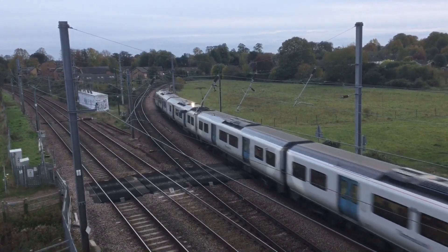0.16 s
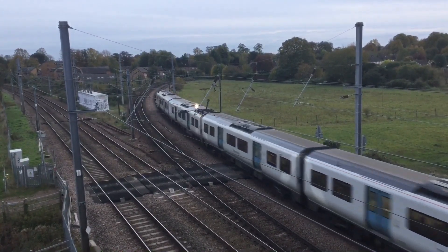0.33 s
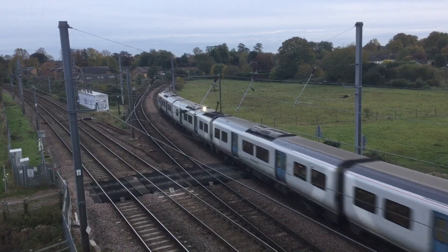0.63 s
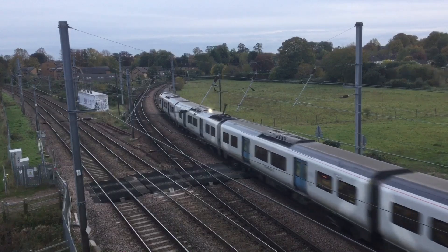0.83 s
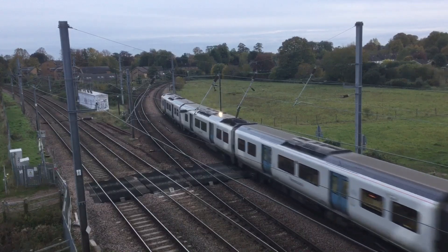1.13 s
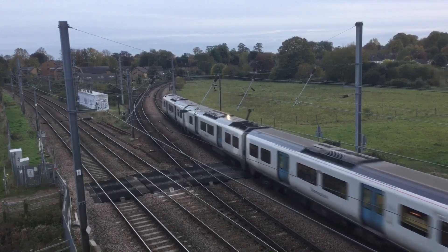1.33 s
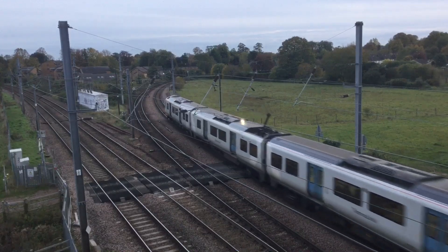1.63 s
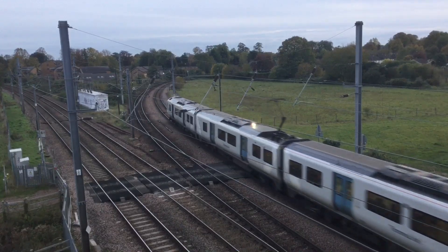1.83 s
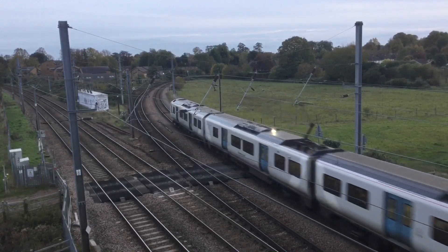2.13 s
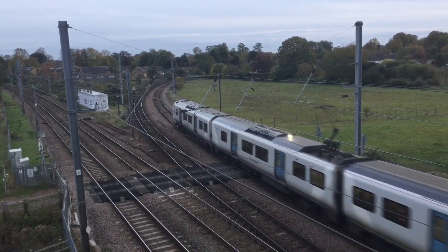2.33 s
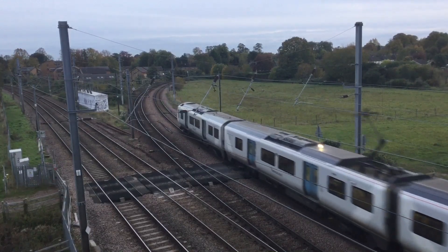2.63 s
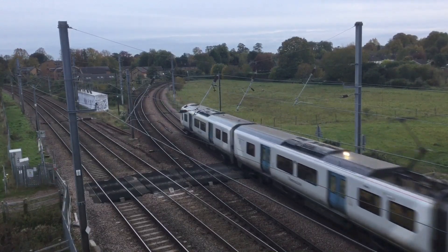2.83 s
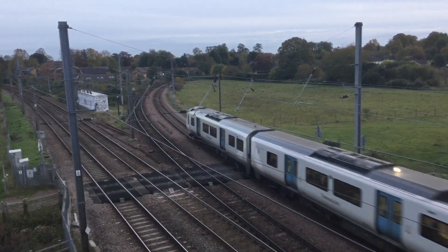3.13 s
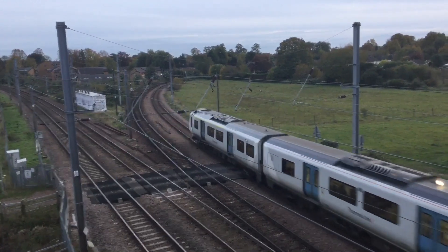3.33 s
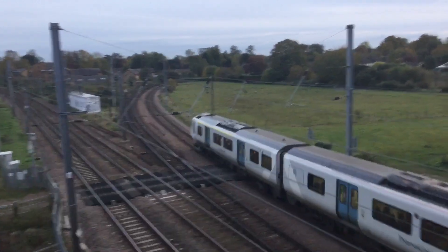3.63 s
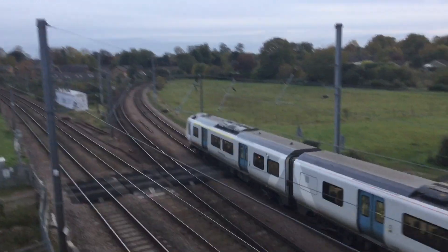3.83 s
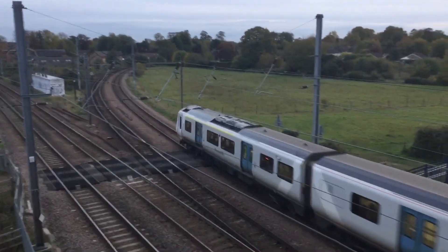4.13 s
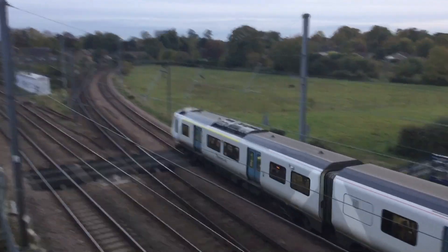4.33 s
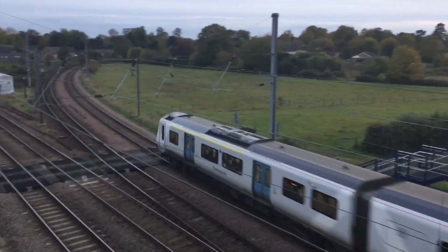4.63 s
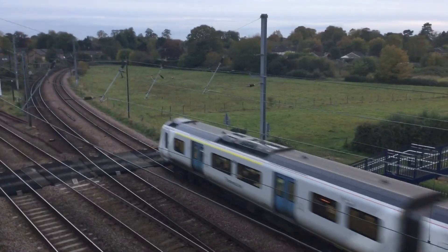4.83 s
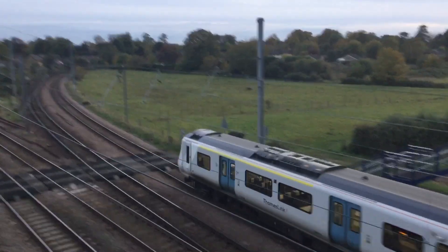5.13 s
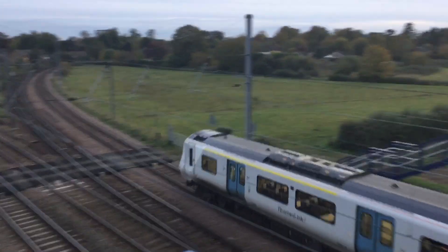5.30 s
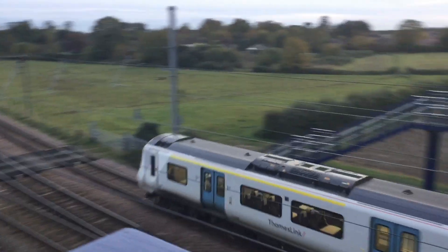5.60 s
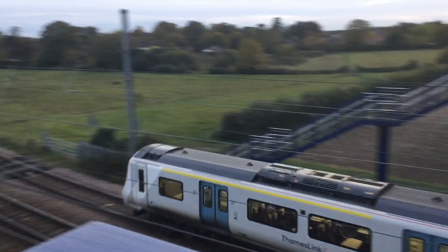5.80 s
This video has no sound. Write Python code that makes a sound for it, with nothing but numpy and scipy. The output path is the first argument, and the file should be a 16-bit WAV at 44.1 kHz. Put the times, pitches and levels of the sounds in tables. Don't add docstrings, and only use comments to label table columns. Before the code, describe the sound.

Steady rolling roar and airy hiss of an electric train, broken by deep track thumps, steel clanks and one tiny flange squeak.

```python
import sys
import numpy as np
from scipy import signal
from scipy.fft import rfft, irfft
from scipy.io import wavfile
from scipy.ndimage import uniform_filter1d

SR = 44100
rng = np.random.default_rng(int(sys.argv[2]) if len(sys.argv) > 2 else 0)


def pcm_store(signal):
    levels = np.round(np.clip(np.atleast_2d(signal), -1, 1) * 32767)
    wavfile.write(sys.argv[1], SR, levels.astype(np.int16).T)


def convert_level_to_amplitude(level_db):
    exponent = np.asarray(level_db, float) / 20
    return 10 ** exponent


N = 262835

# (pitch_hz, width_hz, level_db)
WHEEL_MODES = [(1424, 51, -6), (2130, 130, -2), (2826, 76, -4.5), (3614, 73, -13), (4720, 60, -16),
               (5680, 140, -18.5)]
# (start_s, peak_db, upper_rail_modes_db, wheel_crack_db,
# lean_db from the second mode to the lowest)
JOINT_CLANKS = [(0.544, -15.5, -3.5, -11.5, -12), (0.737, -17, -5.5, -11.5, -11.5),
                (1.052, -12.5, -6.5, -15, -15.5), (1.241, -17.5, -2.5, -12, -8),
                (1.603, -15, -20, -37, -8.5), (2.25, -19.5, 0.5, -11, -5), (2.439, -20.5, -10, -9.5, -7.5),
                (2.764, -23.5, -5, -7.5, -13), (2.944, -19, -13, -13, -10.5), (3.978, -14, -6, -16, -16),
                (4.163, -19.5, -6.5, -11, -12), (4.486, -14.5, -4.5, -16.5, -25),
                (4.678, -17, -5.5, -16, -9), (5.181, -23.5, -1, -26, -15), (5.712, -16.5, 0, -12.5, 0.5),
                (5.902, -17.5, -4.5, -13.5, 8)]


def evened(x):
    return x / np.sqrt(np.mean(x ** 2) + 1e-20)


def read(points, hz):
    f, value = np.transpose(points)
    return np.interp(np.log(hz + 1), np.log(f + 1), value)


def add(mix, s, sound):
    at = round(s * SR)
    part = mix[max(at, 0):][:len(sound) + min(at, 0)]
    part += sound[max(-at, 0):][:len(part)]


def colour(x, points):
    gain = convert_level_to_amplitude(read(points, np.fft.rfftfreq(len(x), 1 / SR)))
    return evened(irfft(rfft(x) * gain, len(x)))


def resonate(x, hz, width):
    turn = np.exp(2j * np.pi * np.cumsum(hz * np.ones(len(x))) / SR)
    r = np.exp(-np.pi * width / SR)
    return 2 * (turn * signal.lfilter([1 - r], [1, -r], x / turn)).real


def resonate_twice(x, hz, width):
    return evened(resonate(resonate(x, hz, width), hz, width))


def drift(seconds):
    size = int(seconds * SR)
    return evened(uniform_filter1d(uniform_filter1d(rng.standard_normal(N), size), size))


def patchy(points, patchy_db, flicker_db):
    frames = N // 128 + 5
    a, b, patches = rng.standard_normal((frames, 257, 3)).T
    patches = evened(uniform_filter1d(uniform_filter1d(patches, size=5, axis=0), size=16, axis=1))
    flicker = evened(uniform_filter1d(rng.standard_normal(frames), size=6))
    z = (a + 1j * b) * convert_level_to_amplitude(patchy_db * patches + flicker_db * flicker)
    return colour(signal.istft(z, nperseg=512, noverlap=384)[1][:N], points)


def wheel_rings():
    rings = np.zeros(N)
    for hz, width, db in WHEEL_MODES:
        waver_db = 2.1 * drift(0.0077) + 1.2 * drift(0.043)
        pitch = hz * (1 + 0.0087 * drift(0.11))
        ring = resonate(rng.standard_normal(N), pitch, width)
        rings += convert_level_to_amplitude(db + waver_db) * evened(resonate(ring, hz, 3 * width))
    return evened(rings)


def rolling():
    # (start_s, rumble_db)
    weight = [(0, -31.5), (.55, -32.5), (.68, -32), (.86, -32.5), (2.01, -32.5), (2.36, -30), (2.56, -32.5),
              (3.25, -32.5), (3.8, -29.5), (3.89, -30.5), (4.7, -30.5), (4.85, -33.5), (4.98, -31.5),
              (5.41, -28.5), (5.58, -32.5), (5.66, -43), (5.75, -24.5), (5.96, -35.5)]
    # (pitch_hz, level_db per Hz)
    rumble_tone = [(15, -42), (25, -7), (63, 1.5), (151, -1.5), (258, -4), (392, -14), (551, -9.5),
                   (1200, -27.5), (1560, -36), (2640, -120)]
    roar_tone = [(470, 9), (800, 3), (1910, -2), (2110, 0.5), (2570, -4), (2840, -5), (3060, -6),
                 (3800, -14), (5760, -21), (11600, -39.5), (14100, -43), (15600, -64)]
    t = np.arange(N) / SR
    rumble_db = np.interp(t, *np.transpose(weight))
    roar_db = -37.85 - 1.18 * uniform_filter1d(rumble_db + 32, size=SR // 2)
    coach_s, roof_fan_s, tail_s = 1.71, 1.75, 4.5
    hiss_db = -55 + 1.5 * np.cos(2 * np.pi * (t - roof_fan_s) / coach_s)
    hiss_db -= 2.5 * np.maximum(t - tail_s, 0)
    rumble = patchy(rumble_tone, patchy_db=1.6, flicker_db=2.6) * convert_level_to_amplitude(rumble_db - 1)
    roar = patchy(roar_tone, patchy_db=2.0, flicker_db=-0.32)
    hiss = signal.sosfiltfilt(signal.butter(2, 4500, "high", fs=SR, output="sos"), roar)
    body = roar - hiss + convert_level_to_amplitude(-9) * wheel_rings()
    return rumble + body * convert_level_to_amplitude(roar_db) + evened(hiss) * convert_level_to_amplitude(hiss_db)


def thuds(blows):
    out, t = np.zeros(N), np.arange(-.04, .12, 1 / SR)
    for (s, db, hz, ms), (p, q) in zip(blows, rng.random((len(blows), 2))):
        spread = 0.00035 * ms
        lead = np.exp(-np.clip(t + 0.85 * spread, -.002, 1) / (.5 * spread))
        bed = np.cos(2 * np.pi * (hz * (t - 0.45 * spread * lead) + p))
        ground_db = -5.5 if hz < 200 else -6.5
        ground = convert_level_to_amplitude(ground_db) * np.cos(2 * np.pi * (0.542 * hz * t + q))
        swell = np.exp(-.5 * (t / spread / np.where(t < 0, .4, 1.35)) ** 2)
        add(out, s - .043, convert_level_to_amplitude(db) * (bed + ground) * swell)
    return out


def bed_blows():
    # (peak_s, peak_db, pitch_hz, length_ms)
    sleepers = [(.007, -18.5, 79.6, 13), (.107, -23, 140, 43), (.323, -21.5, 139, 37),
                (.499, -23.5, 128, 45), (.721, -16, 163, 17), (.828, -18.5, 88.5, 17),
                (.975, -14, 154, 3.5), (1.456, -17.5, 115, 18), (1.548, -22, 133, 41),
                (1.657, -14, 115, 8.1), (2.173, -7.5, 143, 12), (2.683, -13.5, 136, 7.9),
                (3.233, -28, 108, 56), (3.496, -24, 164, 72), (3.599, -23, 129, 29),
                (4.079, -14.5, 124, 18), (4.204, -23, 118, 22), (4.757, -14, 151, 12), (4.79, -23, 118, 18),
                (4.895, -18, 122, 12), (4.935, -15, 148, 12), (5.19, -16, 112, 65), (5.296, -12.5, 125, 11),
                (5.319, -16, 162, 17), (5.449, -12.5, 159, 5.9), (5.527, -15, 85.5, 14),
                (5.576, -10.5, 114, 11.5), (5.606, -21, 97, 28), (5.805, -22.5, 65.4, 63),
                (5.92, -17, 158, 37)]
    # (start_s, peak_db, pitch_hz)
    drops = [(.175, -20, 239), (.524, -16.5, 177), (.679, -23.5, 220), (1.11, -15.5, 240),
             (1.272, -18.5, 242), (1.346, -11, 215), (1.362, -13.5, 197), (1.582, -16, 156),
             (1.62, -16, 169), (1.737, -16, 172), (2.206, -24, 226), (2.342, -13, 162), (2.462, -23.5, 224),
             (2.523, -22.5, 232), (2.768, -7.5, 203), (2.812, -24, 161), (2.859, -21, 213),
             (3.026, -19, 249), (3.155, -32.5, 207), (3.542, -22, 172), (3.647, -22, 190),
             (3.67, -21.5, 184), (3.712, -35.5, 242), (3.795, -11, 186), (4.189, -18, 218),
             (4.473, -9.5, 182), (4.595, -13.5, 173), (5.068, -29, 174), (5.374, -17, 186),
             (5.797, -21.5, 211)]
    # (start_s, peak_db, pitch_hz)
    knocks = [(.015, -17, 316), (.337, -19, 375), (.869, -32, 288), (1.323, -24.5, 267), (1.464, -22, 294),
              (1.546, -20.5, 336), (1.956, -36, 276.6), (2.08, -21.5, 268), (2.267, -22, 247),
              (2.343, -13, 350), (2.668, -24.5, 281), (2.947, -32.5, 500), (3.736, -23, 264),
              (3.881, -31, 245), (3.932, -23, 260), (3.944, -31.5, 265), (4.005, -14, 356),
              (4.06, -20, 290), (4.225, -9.5, 228), (4.46, -20, 358), (4.51, -35.5, 251), (5.065, -15, 327),
              (5.106, -27, 253), (5.216, -18, 300), (5.271, -23.5, 252), (5.352, -11, 228),
              (5.419, -18.5, 270), (5.569, -18, 300), (5.727, -8.5, 261), (5.779, -9.5, 272)]
    # (delay_s, level_db, pitch_hz, length_ms)
    joint_bed = [(0.012, -5, 155, 23.6), (0.00469, -6.5, 337, 10), (0.043, -17, 267, 37),
                 (0.1, -15.5, 136, 23)]
    # (start_s, peak_db, pitch_hz)
    far_joints = [(0.03, -26.5, 227), (0.267, -26, 680), (0.284, -28.5, 260), (0.403, -31, 527),
                  (0.449, -31, 184), (0.59, -24, 460), (1.083, -25, 227), (1.139, -24, 413),
                  (1.295, -23, 245), (1.396, -29, 151), (1.453, -22.5, 347), (1.955, -24.5, 304),
                  (2.19, -24, 487), (2.226, -20.5, 300), (2.23, -24, 160), (2.252, -14, 484),
                  (2.297, -23, 685), (2.318, -26, 198), (2.321, -35, 458), (2.379, -26, 302),
                  (2.458, -33, 113), (2.465, -22.5, 480), (2.488, -21, 256), (2.617, -29, 150),
                  (2.765, -15.5, 205), (2.771, -18.5, 556), (2.839, -36, 487), (2.988, -28, 455),
                  (2.993, -29, 282), (3.236, -28.5, 260), (3.32, -28, 524), (3.541, -35, 186),
                  (3.618, -33, 263), (3.73, -29, 685), (3.825, -32, 263), (3.882, -35, 263),
                  (3.932, -27, 280), (3.981, -14.5, 513), (4.001, -25, 330), (4.113, -35, 491),
                  (4.2, -17, 445), (4.226, -18.5, 274), (4.317, -43, 121), (4.333, -40, 229),
                  (4.403, -33, 280), (4.49, -14, 525), (4.773, -24.5, 425), (4.89, -32, 746),
                  (4.919, -31, 460), (5.009, -29, 105), (5.01, -38, 324), (5.017, -29, 655),
                  (5.093, -22, 213), (5.098, -23, 491), (5.191, -14, 790), (5.521, -26, 387),
                  (5.593, -23, 393), (5.717, -16, 440), (5.908, -13.5, 420), (5.91, -18.5, 800)]
    rows = list(sleepers)
    for table, cycles in ((drops, 1.56), (knocks, 1.7)):
        for s, db, hz in table:
            softer = np.exp(-0.142 * (db + 12.5))
            rows.append((s, db, hz, 1000 / hz * cycles * softer))
    for s, db, *_ in JOINT_CLANKS:
        rows += [(s + late, db + bed_db, hz, ms) for late, bed_db, hz, ms in joint_bed]
    far_late_s, far_cycles = 0.00404, 3.37
    rows += [(s + far_late_s, db, hz, 1000 / hz * far_cycles) for s, db, hz in far_joints]
    return thuds(rows)


def echoes(x):
    t = np.arange(0, .5, 1 / SR)
    hits = rng.random(len(t)) < 1500 / SR
    t60 = 0.17
    taps = rng.standard_normal(len(t)) * hits * convert_level_to_amplitude(-60 * t / t60) * (t > .008)
    return signal.fftconvolve(x, taps / np.linalg.norm(taps))[:N]


def stray_blows():
    # (peak_s, peak_db, pitch_hz, length_ms)
    strays = [(.073, -38, 1250, 5), (.203, -34, 1280, 5), (.267, -36, 780, 5.2), (.32, -31, 740, 6),
              (.338, -23.5, 268, 18), (.465, -35, 1300, 5), (.569, -24, 268, 12), (.716, -15.5, 247, 12),
              (.728, -33, 1190, 5), (.733, -19.5, 330, 8), (.977, -38, 1150, 6), (1.086, -36, 1250, 6),
              (1.264, -31, 1250, 6), (1.545, -33, 786, 7.6), (1.584, -25, 447, 8), (1.883, -40, 1300, 5),
              (2.069, -24, 330, 4.1), (2.297, -32, 800, 7), (2.757, -21, 208, 9.7), (2.858, -23, 160, 14),
              (2.954, -32, 1200, 8), (3.713, -36, 710, 15), (3.96, -24, 450, 11), (3.97, -22, 85, 24),
              (4.462, -34, 746, 9.1), (4.482, -15, 267, 9.5), (4.578, -20.5, 260, 8),
              (4.581, -20, 153, 9.9), (4.843, -39, 1300, 5.6), (4.938, -23, 80, 28), (5.12, -21, 75, 35),
              (5.188, -14, 262, 7.2), (5.209, -34, 1250, 6), (5.342, -24, 170, 14), (5.738, -28, 457, 9),
              (5.777, -29, 150, 14), (.56, -20, 170, 10), (.549, -22, 890, 6.4), (1.61, -22, 320, 14),
              (1.066, -33, 1090, 10), (2.03, -30, 70, 35), (3.36, -31.5, 257, 28), (4.79, -31, 700, 6),
              (5.6, -27, 220, 18), (5.72, -22, 420, 11), (5.715, -24, 880, 11), (4.167, -29, 650, 6),
              (1.058, -29, 940, 7.1)]
    return thuds(strays)


def raps():
    # (start_s, peak_db, pitch_hz)
    edges = [(0.333, -18, 490), (0.521, -23, 700), (1.345, -16.5, 470), (1.45, -25, 398), (1.556, -19, 690),
             (1.58, -22, 560), (1.614, -10.5, 580), (2.167, -13, 472), (2.203, -14.5, 460),
             (2.454, -17, 484), (3.709, -23, 640), (3.921, -22, 613), (4.074, -15, 430), (4.224, -12, 442),
             (4.455, -19, 430), (4.574, -14, 450), (4.752, -17.5, 433), (4.789, -23.5, 660),
             (5.064, -10, 480), (5.085, -34, 457), (5.11, -10.5, 550), (5.19, -20, 860), (5.209, -20, 595),
             (5.413, -26, 526), (5.443, -20, 476), (5.521, -25, 410), (5.563, -19.5, 507)]
    out, t = np.zeros(N), np.arange(0, .03, 1 / SR)
    for (s, db, hz), p in zip(edges, rng.random(len(edges))):
        turns = hz * (t - 0.00032 * np.exp(-t / 0.0018)) + p
        shape = (1 - np.exp(-t / 0.0015)) * np.exp(-t / 0.0017)
        add(out, s + 0.00069, convert_level_to_amplitude(db + 9.0) * np.cos(2 * np.pi * turns) * shape)
    return out


def sizzles():
    # (start_s, peak_db, brightness_db an octave)
    strikes = [(.538, -35.5, -1), (0.74, -40, -10.5), (1.043, -35, 4), (1.243, -48, -6), (2.243, -58, -14),
               (2.448, -47, -17), (2.75, -52, -12), (2.95, -57, -12), (3.969, -34, -2), (4.16, -40, -11),
               (4.479, -33.5, -2), (4.681, -44, -10), (5.704, -39.5, 3), (5.907, -54, -12)]
    # (pitch_hz, level_db per Hz)
    sizzle_tone = [(2350, -1), (4000, -8), (4690, -4), (5890, -7), (7780, -7), (8430, -5.5), (9880, -6.5),
                   (11600, -1), (15000, -12), (15600, -16)]
    # (pitch_hz, width_hz, level_db)
    end_modes = [(6400, 60, -8), (6380, 35, -3), (6850, 80, -1), (7290, 85, -3), (8000, 42, -4),
                 (8510, 44, 1), (9350, 48, 5), (10600, 150, -6), (11300, 55, -6), (11560, 420, -2),
                 (12600, 130, -3), (13200, 33, -6), (13700, 35, -8), (14700, 100, -7)]
    out, t = np.zeros(N), np.arange(0, .5, 1 / SR)
    t60 = 0.43
    for s, db, tilt_db in strikes:
        tone = [(hz, level + tilt_db * np.log2(hz / 8000)) for hz, level in sizzle_tone]
        tick = 1 + 0.82 * np.exp(-t / 0.0023) + 0.47 * np.exp(-t / 0.046)
        grain = convert_level_to_amplitude(1.1 * evened(uniform_filter1d(rng.standard_normal(len(t)), size=60)))
        shake = rng.standard_normal(len(t))
        modes = sum(convert_level_to_amplitude(mode_db / 2) * evened(resonate(shake, hz, width))
                    for hz, width, mode_db in end_modes)
        fizz = colour(shake + convert_level_to_amplitude(-3) * evened(modes), tone)
        shape = convert_level_to_amplitude(db - 11.5 - 60 * t / t60) * (1 - np.exp(-t / 0.00043))
        add(out, s, tick * grain * fizz * shape)
    return out


def cracks():
    # (start_s, low_crack_peak_db, high_crack_peak_db)
    flares = [(0.5422, -21, -28), (0.7318, -24, -39), (1.0475, -25, -36), (1.2336, -31, -35),
              (2.2467, -19, -35), (2.4354, -25.5, -40), (2.7604, -26, -42), (2.9454, -35, -36),
              (3.9709, -35, -34), (4.1624, -46, -39), (4.4822, -25, -40), (4.6774, -26, -41),
              (5.7048, -27, -37), (5.898, -31, -34)]
    out, t = np.zeros(N), np.arange(0, .1, 1 / SR)
    rise_s, t60 = 0.0018, 0.065
    for s, low_db, high_db in flares:
        shake = rng.standard_normal(len(t))
        low = convert_level_to_amplitude(low_db - 6) * resonate_twice(shake, 1330, 290)
        high = convert_level_to_amplitude(high_db - 6) * resonate_twice(shake, 2200, 800)
        add(out, s - .002, (low + high) * convert_level_to_amplitude(-60 * t / t60) * (1 - np.exp(-t / rise_s)))
    return out


def clanks():
    # (pitch_hz, level_db, t60_s)
    rail_modes = [(441.4, -3.5, 0.079), (543, 2.5, 0.04), (618.6, -12.5, 0.092), (750.7, 3, 0.046),
                  (870, 3, 0.017), (949, -2, 0.052), (1217, -10, 0.028), (1336, -6, 0.025),
                  (1710, -29, 0.0096), (1935, -12.5, 0.024), (2370, -16, 0.038)]
    grit_tone = [(900, 4.0), (1500, -2.0), (2400, -5.5), (3000, -6.5), (6000, -18.5),
                 (10000, -30.0), (15000, -56)]
    out, t = np.zeros(N), np.arange(0, .25, 1 / SR)
    for s, db, upper_db, crack_db, lean_db in JOINT_CLANKS:
        blow = 0.035 * rng.standard_normal(len(t)) * np.exp(-t / 0.029)
        blow[0] = 1
        blow[round(.0115 * SR)] = 0.12
        blow[round(.024 * SR)] = 0.081
        for band_db, modes in ((0, rail_modes[:3]), (upper_db, rail_modes[3:])):
            ring = np.zeros(len(t))
            for hz, mode_db, t60 in modes:
                age = np.maximum(t - 0.008574 * np.sqrt(450 / hz), 0)
                mode_db += (1.3 * lean_db + 11) * (hz < 500)
                hz = hz * rng.uniform(0.911, 1.017)
                fall = convert_level_to_amplitude(mode_db + 0.77 * rng.standard_normal() - 60 * age / t60)
                ring += fall * np.sin(2 * np.pi * hz * age) * (1 - np.exp(-age / 0.0027))
            ring = signal.fftconvolve(ring, blow)[:len(t)]
            add(out, s - .0085, convert_level_to_amplitude(db + band_db) * ring / abs(ring).max())
        grit = colour(rng.standard_normal(len(t)), grit_tone)
        grit += sum(convert_level_to_amplitude(w_db - 22) * evened(resonate(grit, hz, 90)) for hz, _, w_db in WHEEL_MODES[2:4])
        shape = convert_level_to_amplitude(db + crack_db + 0.5 - 60 * t / 0.29) * (1 - np.exp(-t / 0.016))
        add(out, s - .011, evened(grit) * shape)
    return out


def sings():
    # (start_s, peak_db, t60_s)
    notes_sung = [(.55, -36.5, 0.26), (.745, -47, .2), (1.068, -33.5, 0.23), (1.235, -39, 0.15),
                  (1.69, -49, 0.46), (2.277, -35, 0.11), (2.459, -36, .1), (2.77, -45, 0.22),
                  (2.95, -38.5, 0.17), (3.98, -44, 0.18), (4.69, -47, 0.16), (5.465, -44.5, 0.37),
                  (5.63, -49, .3), (5.895, -38, 0.21)]
    out, t = np.zeros(N), np.arange(0, .3, 1 / SR)
    for s, db, t60 in notes_sung:
        hz = 2110 * rng.uniform(.99, 1.01)
        rough = evened(resonate(rng.standard_normal(len(t)), hz, 60))
        note = np.sqrt(2) * np.sin(2 * np.pi * hz * t) + 0.48 * rough
        add(out, s, convert_level_to_amplitude(db - 60 * t / t60) * note * (1 - np.exp(-t / 0.0015)))
    return out


def squeak():
    # (start_s, level_db, slip_rate_hz)
    slips = [
        (1.61, -62, 1014),
        (1.63, -51, 1033),
        (1.65, -49, 1045),
        (1.665, -40, 1029),
        (1.682, -43.5, 1036),
        (1.7, -44, 1042),
        (1.725, -49, 1030),
        (1.75, -54, 1050),
        (1.79, -62, 1070),
    ]
    # (pitch_hz, level_db per Hz)
    squeak_tone = [(2500, -30), (3100, -1), (4200, 1), (5250, 1), (6300, -2), (8300, -8), (11000, -9),
                   (15000, -15), (15700, -19)]
    s, db, hz = np.transpose(slips)
    t = np.arange(s[0], s[-1], 1 / SR)
    rate_hz, scrape = np.interp(t, s, hz), rng.standard_normal(len(t))
    bands, tones = np.zeros(len(t)), np.zeros(len(t))
    for k in range(3, 15):
        level = convert_level_to_amplitude(2.5 * drift(.006)[:len(t)])
        bands += level * resonate_twice(scrape, k * rate_hz, 11 * k ** 2)
    jitter = .007 * evened(uniform_filter1d(scrape, size=90))
    turns = np.cumsum(rate_hz * (1 + jitter)) / SR
    for k in range(3, 10):
        level = convert_level_to_amplitude(2.5 * drift(.008)[:len(t)])
        tones += level * np.cos(2 * np.pi * k * turns + k ** 2)
    voice = evened(evened(bands) + .6 * evened(tones))
    out = np.zeros(N)
    add(out, s[0], convert_level_to_amplitude(np.interp(t, s, db)) * colour(voice + 0.45 * scrape, squeak_tone))
    return out


def drones():
    # (start_s, length_s, level_db, pitch_hz)
    stretches = [
        (1.82, 0.2, -35.5, 260),
        (3.42, 0.2, -34.5, 187),
        (3.691, 0.034, -21, 252),
        (3.859, 0.037, -21.5, 253),
        (3.916, 0.066, -20.5, 254.5),
        (5.26, 0.035, -28, 250),
        (5.336, 0.032, -20, 250),
    ]
    out, t = np.zeros(N), np.arange(SR // 2) / SR
    for s, length, db, hz in stretches:
        note = resonate_twice(rng.standard_normal(SR // 2), hz, 53)
        swell = np.sqrt(np.clip(np.sin(np.pi * np.minimum(t / length, 1)), 0, 1))
        add(out, s, convert_level_to_amplitude(db) * note * swell)
    return out


def scene():
    blows = bed_blows() + raps() + clanks()
    train = rolling() + blows + convert_level_to_amplitude(-17.5) * echoes(blows) + stray_blows()
    return (train + sizzles() + cracks() + sings() + squeak() + drones())[None]


def low_pass(x):
    return signal.sosfilt(signal.butter(12, 15720, fs=SR, output="sos"), x)


def record(dry):
    heard = signal.sosfilt(signal.butter(3, 52, "high", fs=SR, output="sos"), dry)
    ceiling = 0.58
    heard = heard / (1 + abs(heard / ceiling) ** 4) ** .25
    return low_pass(heard)


dry = scene()
out = record(dry)
pcm_store(out)
```